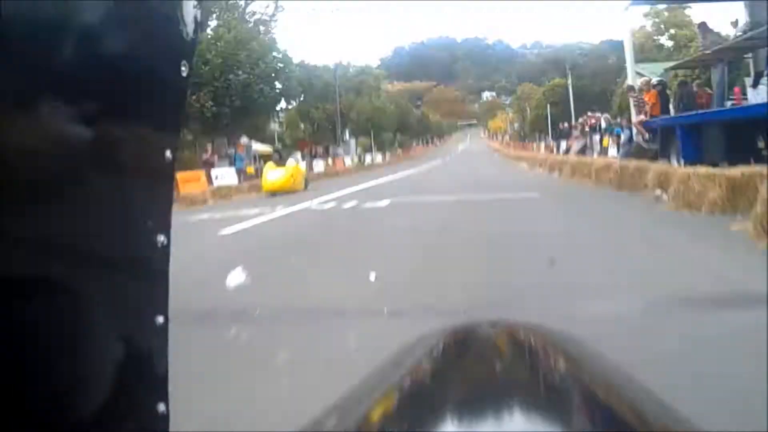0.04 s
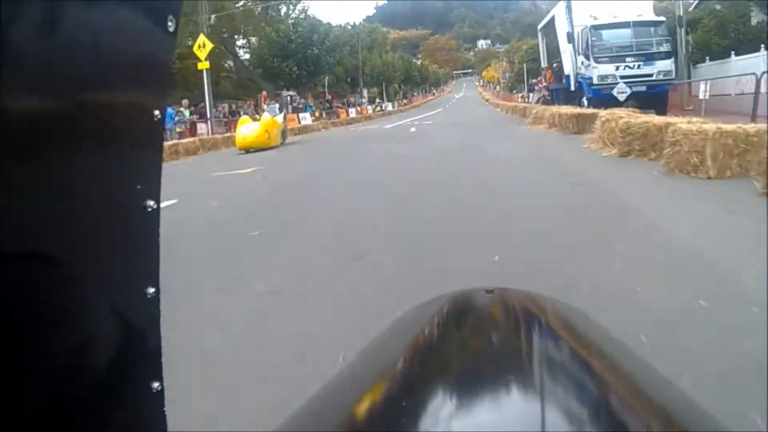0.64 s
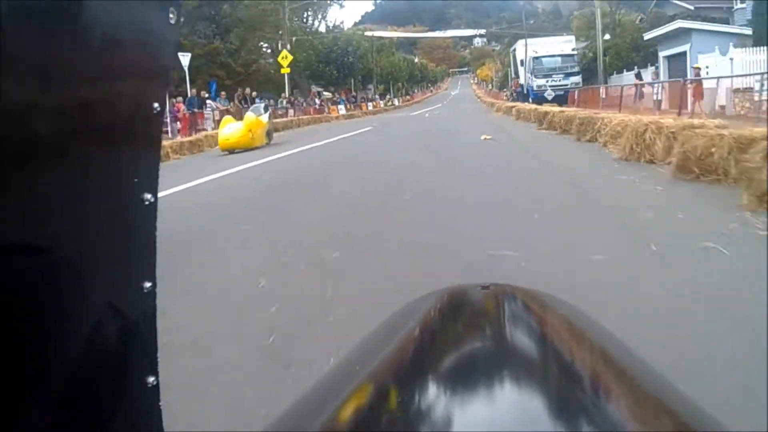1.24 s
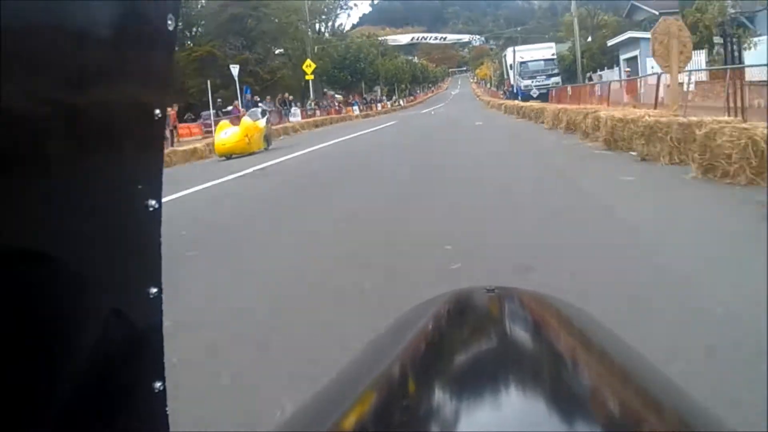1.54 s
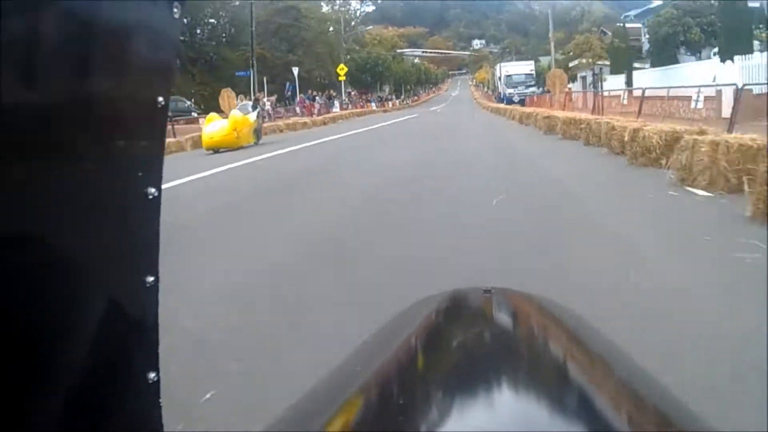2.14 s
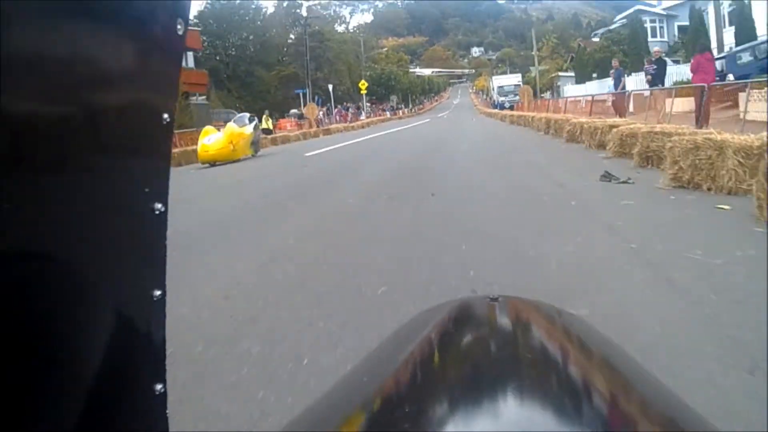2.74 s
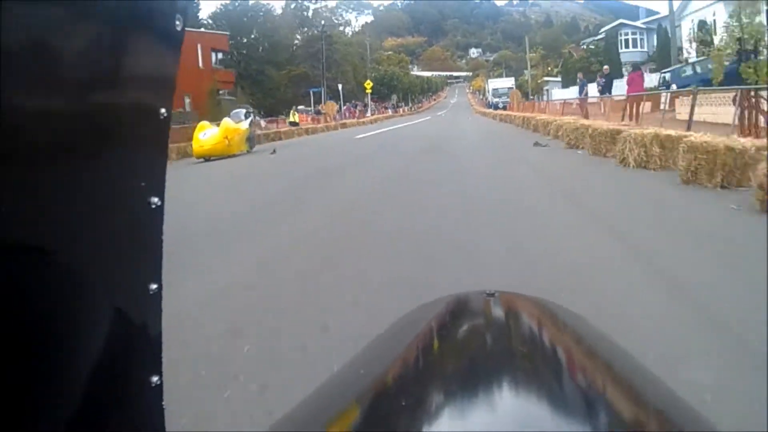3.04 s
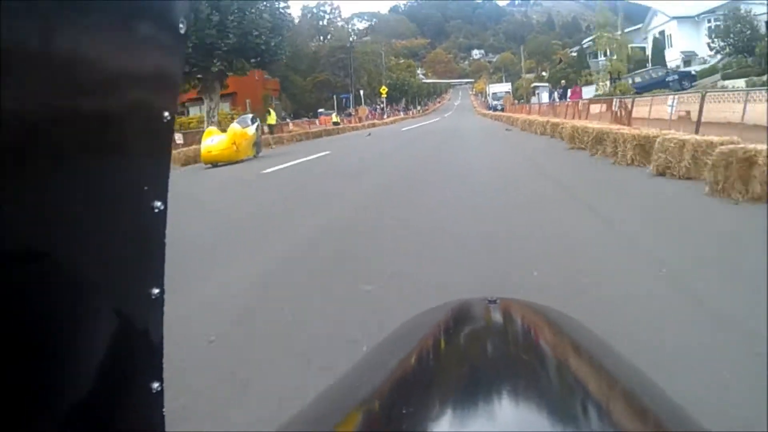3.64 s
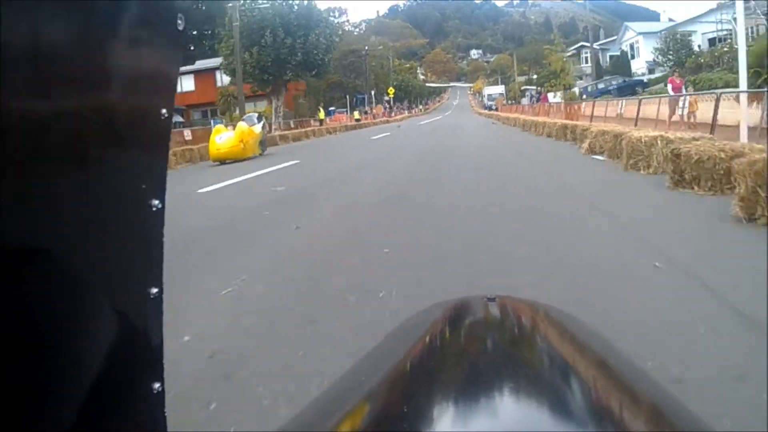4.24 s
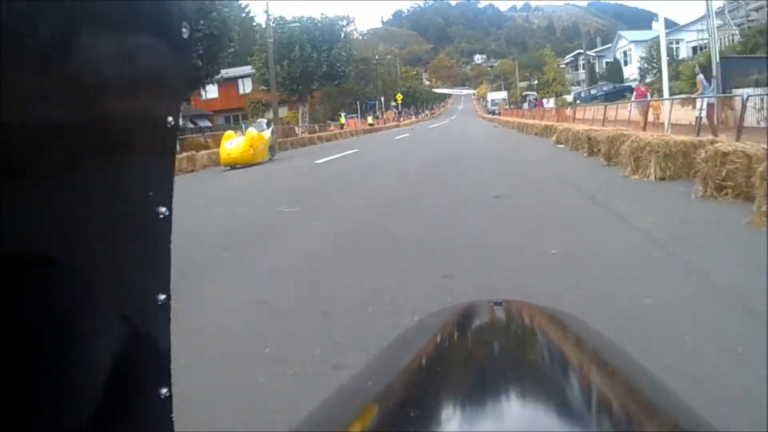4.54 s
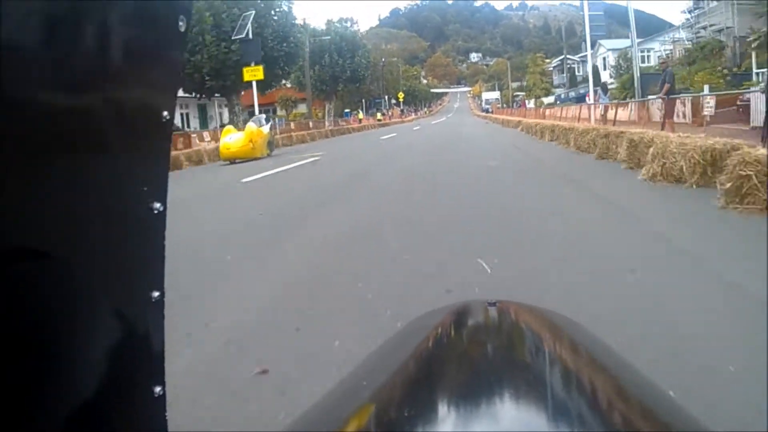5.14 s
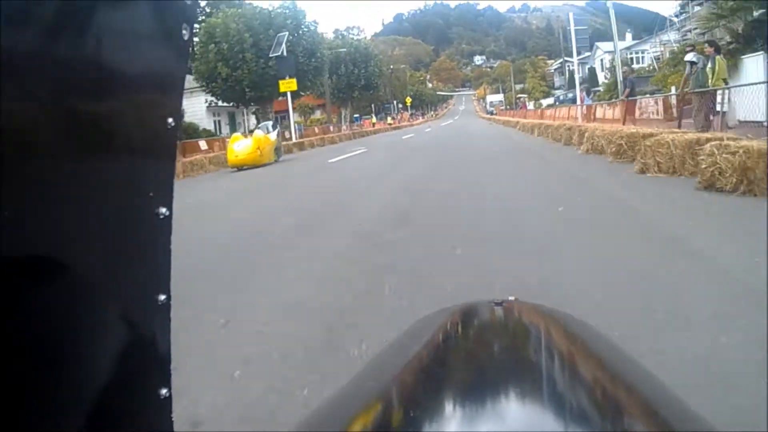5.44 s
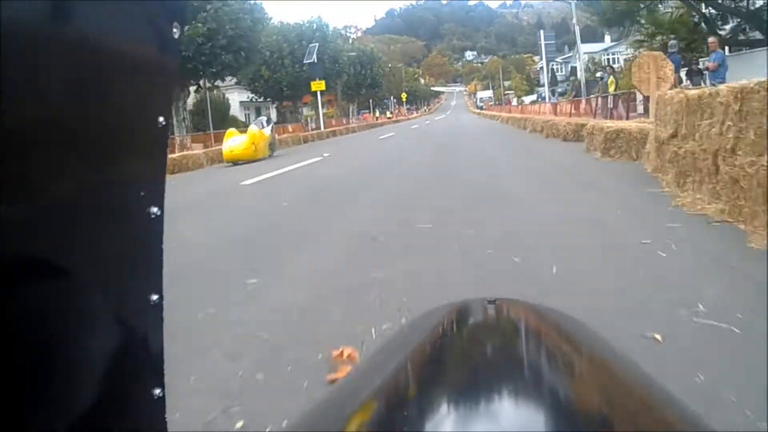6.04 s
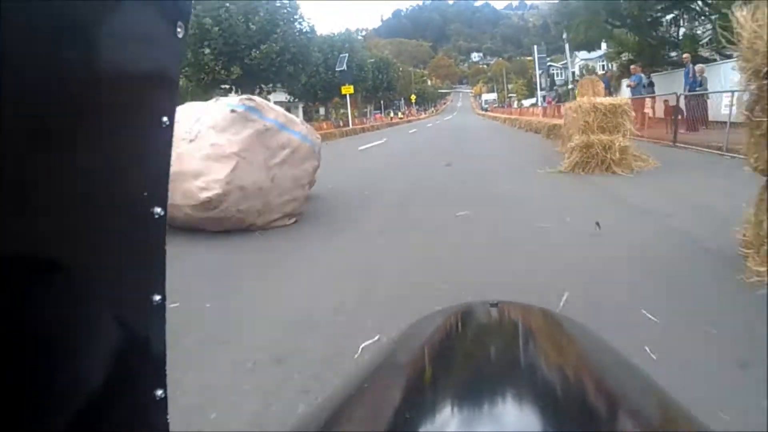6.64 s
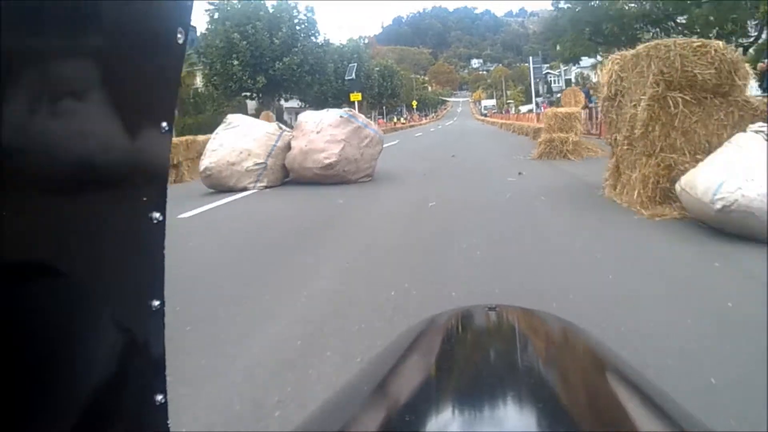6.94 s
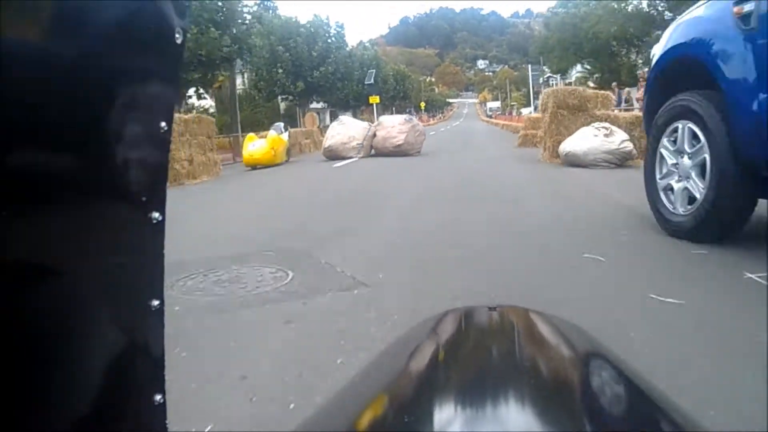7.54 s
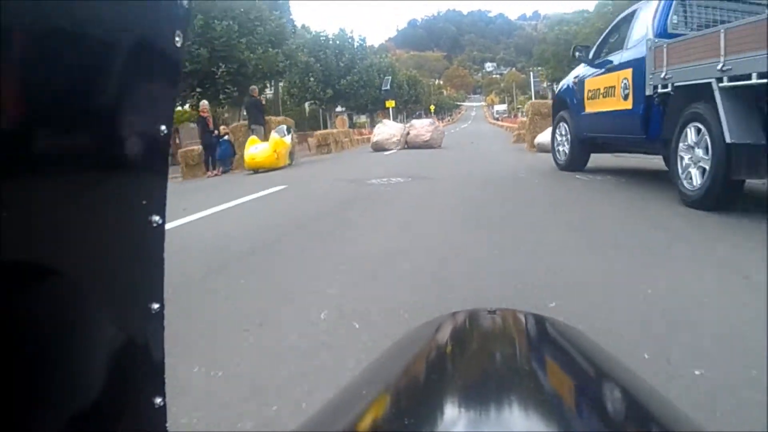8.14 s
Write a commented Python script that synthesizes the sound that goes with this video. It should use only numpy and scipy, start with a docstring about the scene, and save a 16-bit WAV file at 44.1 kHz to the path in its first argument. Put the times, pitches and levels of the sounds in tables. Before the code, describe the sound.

A coasting cart rattles and bangs along a street, its gritty rolling roar and whine gradually sinking as it loses speed.

```python
"""On a street, riding a hollow-bodied gravity cart as it coasts and slows down.
Asphalt grit drums the wheels and sets the shell roaring; the bodywork knocks and rattles, hardest
on the fast first stretch. The running gear whines, falling with the speed, wind rumbles underneath,
and a limiter flattens the hardest blows."""
import sys
import numpy as np
from scipy import signal
from scipy.fft import rfft, irfft
from scipy.io import wavfile
from scipy.ndimage import uniform_filter1d, minimum_filter1d

SR = 44100
rng = np.random.default_rng(int(sys.argv[2]) if len(sys.argv) > 2 else 0)


def materialize(psi):
    """Save the field psi as 16-bit PCM at rate SR to the path in sys.argv[1].

    A 1-D psi becomes a single channel; in a 2-D psi each row is a channel.
    """
    bounded = np.clip(np.atleast_2d(psi).T, -1, 1)
    quanta = np.round(bounded * 32767).astype(np.int16)
    wavfile.write(sys.argv[1], SR, quanta)


N = 370881
TIME = np.arange(N) / SR
START_HZ, CYCLES_PER_TURN = 1806, 97.5   # the gear's opening pitch; its cycles in one wheel turn

# the road, rough at first and then smoother: t/s, shell roar/dB, fine grit/dB
ROAD_LEVELS = [(0.0, -15, -12), (0.09, -15, -22.5), (0.26, -16, -25), (0.51, -18.5, -23.5),
               (0.98, -22.5, -26), (1.61, -17.5, -25), (2.44, -20.5, -25.5), (2.74, -20.5, -25),
               (3.3, -20.5, -28.5), (3.89, -21.5, -28), (4.22, -23.5, -28.5), (4.45, -21.5, -27.5),
               (4.66, -24.5, -30.5), (5.06, -24, -29), (5.34, -25, -28.5), (7.12, -26, -29),
               (7.38, -25.5, -27), (8.41, -29.5, -29.5)]
# ring of the shell: f/Hz, width/Hz, level/dB
SHELL_RESONANCES = [(1156.5, 59, 2), (1257.5, 76, 7), (1423, 138, 4), (1702, 220, 0.5), (2251, 143, 1),
                    (2545, 220, -6.5), (3033, 210, -13.5), (3348, 80, -17), (3604, 83, -19),
                    (4084, 170, -25.5), (5020, 750, -28.5)]
# low ring of frame and cavity: f/Hz, width/Hz, level/dB
FRAME_RESONANCES = [(173, 47, -3.5), (245.7, 24, 0), (320, 20, -10), (462.4, 41, -1.5), (586.4, 93, 0.5),
                    (766, 35, -7), (863, 37, -0.5), (1000, 230, -25.5)]


def from_db(db):
    """Decibels to gain."""
    return 10 ** (np.asarray(db) / 20)


def unit_rms(x):
    """Scale to unit rms."""
    return x / np.sqrt(np.mean(x ** 2) + 1e-20)


def curves(rows):
    """Each column of a breakpoint table at every sample."""
    times, *columns = np.transpose(rows)
    return [np.interp(TIME, times, column) for column in columns]


def drift(rate, hop=40):
    """Smooth, bounded random modulation with spread about 1, moving about rate times a second."""
    pole = np.exp(-2 * np.pi * hop * rate / SR)
    noise = rng.standard_normal(N // hop + 2002)
    slow = signal.lfilter([1], [1, -2 * pole, pole * pole], noise)[2000:]
    bounded = 2.3 * np.tanh(unit_rms(slow) / 2)
    return np.interp(np.arange(N) / hop, np.arange(len(bounded)), bounded)


def response(gain, size=4096):
    """Minimum-phase impulse response with unit energy for a gain given as a function of Hz."""
    hz = np.maximum(np.arange(size // 2 + 1) * SR / size, 1)
    cepstrum = irfft(np.log(gain(hz) + 1e-7))
    cepstrum[1:size // 2] *= 2
    cepstrum[size // 2 + 1:] = 0
    impulse = irfft(np.exp(rfft(cepstrum)))[:size // 2]
    return impulse / np.sqrt(np.sum(impulse ** 2))


def resonances(modes, hz, damping_hz=4300):
    """Gain of a set of broad resonances; damping swallows the top."""
    power = sum(from_db(db) ** 2 / (1 + ((hz - centre) / width) ** 2) ** 2 for centre, width, db in modes)
    return np.sqrt(power / (1 + (hz / damping_hz) ** 24))


def treble_share(hz, crossover_hz=2259):
    """Rises from 0 to 1 into the range where the shell answers to fine grit and hard contacts."""
    return 1 / (1 + (crossover_hz / hz) ** 10)


def excite(force, gain):
    """Play a force through a body with the given gain curve."""
    return signal.oaconvolve(force, response(gain))[:N]


def add(out, at_s, sound):
    """Mix a sound in at a given time."""
    start = max(round(at_s * SR), 0)
    out[start:start + len(sound)] += sound[:N - start]


def gear_hz(sag_hz_per_s=126.1, sag_growth_hz_per_s2=4.67):
    """Pitch of the running gear: it sags with the cart's speed, a little faster as time goes on."""
    return START_HZ - sag_hz_per_s * TIME - sag_growth_hz_per_s2 * TIME ** 2 / 2


def wheel_turns():
    """Turns that the wheels have made so far."""
    return np.cumsum(gear_hz()) / SR / CYCLES_PER_TURN


def grit(per_s, spread_db, flutter_db):
    """Stones meeting the tyres: random small impacts whose strength flutters with wheel load."""
    sizes = from_db(spread_db * np.minimum(rng.exponential(1, N), 4.5)) * rng.choice([-1, 1], N)
    hits = rng.random(N) < per_s / SR
    return unit_rms(sizes * hits * from_db(flutter_db * drift(31)))


def rolling(bounce_db=1.6, wobble_db=0.5):
    """Coarse stones drum the shell and frame; fine grit drives the upper ring and an airy tyre hiss."""
    # bands of the tyre hiss: f/Hz, width/Hz, level/dB
    hiss_bands = [(7040, 270, 4), (10300, 1600, -8.5)]
    roar_db, grit_db = curves(ROAD_LEVELS)
    rumble_db = -39.5 + 0.25 * (roar_db - roar_db.mean())
    speed = gear_hz() / START_HZ
    hiss_gain = from_db(-62) * speed ** 7.5 + from_db(grit_db - 49.5)   # dies to a trace as the cart slows
    wheel_load = from_db(bounce_db * drift(24) + wobble_db * np.sin(2 * np.pi * wheel_turns()))
    stones = grit(per_s=3500, spread_db=2.5, flutter_db=1.5)
    sand = grit(per_s=4500, spread_db=2.5, flutter_db=1.57)
    bumps = grit(per_s=3000, spread_db=1.5, flutter_db=1.0)
    roar = excite(stones, lambda hz: resonances(SHELL_RESONANCES, hz) * np.sqrt(1 - treble_share(hz)))
    sizzle = excite(sand, lambda hz: resonances(SHELL_RESONANCES, hz) * np.sqrt(treble_share(hz)))
    rumble = excite(bumps, lambda hz: resonances(FRAME_RESONANCES, hz))
    hiss = excite(sand, lambda hz: resonances(hiss_bands, hz, damping_hz=15000))
    shell = from_db(roar_db - 0.5) * roar + from_db(grit_db + 0.5) * sizzle
    return wheel_load * (shell + from_db(rumble_db) * rumble + hiss_gain * hiss)


def wind(gust_db=1.5):
    """The air stream flutters on the microphone and makes the hollow body boom."""
    # buffeting by the air stream: t/s, deep flutter/dB, boom/dB
    buffeting = [(0.0, -49, -47), (1.19, -55, -48.5), (2.86, -53.5, -51), (3.42, -61.5, -61),
                 (3.93, -59, -56), (4.26, -64, -61), (8.06, -57, -62.5), (8.41, -66, -65)]
    flutter_db, boom_db = curves(buffeting)
    flutter = excite(rng.standard_normal(N), lambda hz: resonances([(30, 23, 0)], hz))
    boom = excite(rng.standard_normal(N), lambda hz: resonances([(67, 32, -1), (92, 24, -6.5)], hz))
    return flutter * from_db(flutter_db + 4.5 + gust_db * drift(8)) + boom * from_db(boom_db + 1.5)


def shaken_tone(phase, roughness, flutter_db):
    """A partial whose strength flutters, with a narrow skirt of noise from road vibration."""
    skirt = drift(55) * np.sin(phase) + drift(42) * np.cos(phase)
    flutter = from_db(flutter_db * drift(28))
    return unit_rms((np.sin(phase) + roughness * skirt) * flutter)


def gear_whine(level_db=2.0, throb_db=2.6):
    """A falling whine that throbs with each turn; harmonics swell as they cross the axle's resonances."""
    # partials of the whine: multiple, level/dB, roughness/0-1, flutter/dB
    harmonics = [(1, .3, .35, 2), (2, -6.5, .55, 2.6), (5, -6, .5, 1.5)]
    # ring of the axle mount: f/Hz, width/Hz, level/dB
    axle_modes = [(615, 20, -37), (663.4, 14, -36.5), (784, 18, -44), (884, 28, -47), (1243.6, 42, -22.5),
                  (1331, 18, -22.5), (1397, 31, -28), (1535, 22, -27), (1605, 25, -24), (1758, 26, -21),
                  (1837, 28, -25), (2190, 20, -16), (2258, 30, -14), (2380, 81, -21), (2540, 73, -32),
                  (3300, 65, -37)]
    pitch, wheel_angle = gear_hz(), 2 * np.pi * wheel_turns()
    throb = unit_rms(from_db(throb_db * np.sin(wheel_angle + 1.4 * drift(8.9))))
    whine = np.zeros(N)
    for multiple, db, roughness, flutter_db in harmonics:
        tone = shaken_tone(multiple * CYCLES_PER_TURN * wheel_angle, roughness, flutter_db)
        whine += from_db(level_db + db) * resonances(axle_modes, multiple * pitch) * tone
    return throb * whine


def low_thuds(cutoff_hz=340, size=8000):
    """Dull low thuds under the hard knocks and rattles."""
    # bursts of low noise: t/s, length/s, level/dB
    thuds = [(0, 0.13, -28), (1.765, 0.015, -28.5), (2.218, 0.0084, -28), (2.901, 0.066, -25.5),
             (5.48, 0.033, -49)]
    out, t = np.zeros(N), TIME[:size]
    low_band = response(lambda hz: hz / (hz + 30) / (1 + (hz / cutoff_hz) ** 3))
    for at_s, length, db in thuds:
        burst = rng.standard_normal(size) * np.exp(-(t / length) ** 4)
        add(out, at_s, from_db(db) * signal.fftconvolve(burst, low_band))
    return out


def struck_body(bright_db, panel_db, panel_hz=2550, panel_octaves=0.89, uneven_db=2.0):
    """Ring of shell and frame: each spot favours other resonances, a hard contact the upper ones."""
    modes = [(hz, 0.83 * width, db + uneven_db * rng.standard_normal())
             for hz, width, db in SHELL_RESONANCES]

    def gain(hz):
        """A loose panel adds its own broad ring to the shell's, over the frame and a low thump."""
        panel = np.exp(-(np.log2(hz / panel_hz) / panel_octaves) ** 2)
        shell = resonances(modes, hz) * from_db(bright_db * treble_share(hz) + panel_db * panel)
        frame = from_db(-16) * resonances(FRAME_RESONANCES, hz)
        thump = from_db(-17) / (1 + (hz / 220) ** 2)
        return shell + frame + thump
    return response(gain)


def rattles(tail_s=0.0046, spread_db=2.5, size=5000):
    """Panels buzz against each other in a dense run of contacts, then settle."""
    # loose panels chattering after a bump: t/s, length/s, level/dB
    chatter = [(.001, 0.042, 8), (.062, 0.025, -5.5), (.181, 0.022, -17), (.207, 0.024, -10.5),
               (.599, 0.029, -6.5), (.642, 0.036, -6.5), (1.43, .025, -19), (1.667, 0.018, -8.5),
               (1.787, 0.015, -18.5), (1.852, 0.016, -15), (2.368, 0.0084, -9.5), (2.629, 0.011, -9.5),
               (2.938, 0.01, -4), (3.631, 0.048, -23), (4.83, 0.035, -25), (5.16, .06, -25.5),
               (5.502, 0.016, -16.5), (5.69, 0.076, -23.5), (7.56, 0.094, -26)]
    out, t = np.zeros(N), TIME[:size]
    rows = chatter + wheel_buzzes()
    bodies = [struck_body(bright_db=9.5, panel_db=5.0) for _ in rows]
    for (at_s, length, db), body in zip(rows, bodies):
        contacts = rng.standard_normal(size) * from_db(spread_db * rng.standard_normal(size))
        envelope = np.exp(-np.maximum(t - length, 0) / tail_s - 0.14 * t / length)
        buzz = signal.fftconvolve(contacts * envelope, body)
        burst = buzz[TIME[:len(buzz)] < length + 0.001]
        add(out, at_s, from_db(db) * buzz / np.std(burst))
    return out


def knocks(contact_s=0.0038, tail_s=0.025, tail_db=-22, size=2600):
    """A brief crunching contact, then a weak shiver of the panels; the level is set on the attack."""
    # hard single knocks of the bodywork: t/s, level/dB, brightness/dB
    hard_knocks = [(.107, -1, -10), (.116, -2.5, -2), (.248, -7, 12.5), (.254, -5, -18), (.330, -12, 12),
                   (.422, -5, -28), (.552, 0, 6.5), (.722, -7, -3), (.731, -7.5, -20), (.746, -7.5, -5),
                   (.894, -16, -11), (1.311, -11.5, -7), (1.519, -12, -1), (1.571, -12, -4),
                   (1.602, -9.5, 1), (1.652, -12.5, 4.5), (1.764, -4, 2.5), (1.826, -5, 7),
                   (2.088, -11.5, -7), (2.220, 5, -5.5), (2.553, -10, -7), (2.891, -10, 3), (2.905, 4, -2),
                   (2.932, 6, -6.5), (2.973, 0.5, -11), (3.168, -12, -5), (3.238, -13, 4), (3.516, -17, -3),
                   (4.668, -20, -1.5), (5.477, -16.5, -16), (5.503, -9, -3), (5.950, -17, 6),
                   (6.166, -15, 4), (7.137, -20, -3)]
    out, t = np.zeros(N), TIME[:size]
    rows = hard_knocks + light_knocks()
    envelope = np.exp(-(t / contact_s) ** 4) + from_db(tail_db) * np.exp(-t / tail_s)
    forces = rng.standard_normal((len(rows), size)) * envelope
    for (at_s, db, bright_db), force in zip(rows, forces):
        blow = signal.fftconvolve(force, struck_body(bright_db + 6, panel_db=2.5))
        attack = blow[TIME[:len(blow)] < 0.0045]
        add(out, at_s, from_db(db) * blow / np.std(attack))
    return out


def light_knocks(count=24, spread_db=2.5, bright_db=-2):
    """Small bumps at random, stronger on rough road: rows of t/s, level/dB, brightness/dB."""
    when, strength = rng.random((count, 2)).T
    times = when * N / SR
    roar_db, _ = curves(ROAD_LEVELS)
    levels = np.interp(times, TIME, roar_db) + spread_db * (2 * strength - 1)
    return [(at_s, db, bright_db) for at_s, db in zip(times, levels)]


def wheel_buzzes(start_s=2.505, length_s=0.02):
    """For a while one buzz per wheel turn, spreading as the cart slows: rows of t/s, length/s, level/dB."""
    # panel buzz, turn by turn: level/dB
    levels = [-6, 1.5, -10, -13.5, -12.5, -11.5, -7, -18.5, -16.5, -23, -14.5, -16]
    turns = wheel_turns()
    first_turn = np.interp(start_s, TIME, turns)
    return [(np.interp(first_turn + k, turns, TIME), length_s, db) for k, db in enumerate(levels)]


def scene():
    """The bed of the ride and the hits on top of it, heard in mono from the cart."""
    ride = rolling() + wind() + gear_whine()
    hits = knocks() + rattles() + low_thuds()
    return (ride + hits)[None]


def limiter(x, ceiling=1.277, release_db_per_s=1500, size=61):
    """The gain ducks just ahead of a peak and recovers quickly."""
    over_db = 20 * np.log10(np.maximum(np.abs(x) / ceiling, 1))
    release_db = release_db_per_s * TIME
    held_db = np.maximum.accumulate(over_db + release_db, axis=-1) - release_db
    lookahead_db = -minimum_filter1d(-held_db, size // 2)
    duck_db = uniform_filter1d(uniform_filter1d(lookahead_db, size), size)
    return x * from_db(-duck_db)


def overload(x, hardness=11):
    """Peaks that slip past the limiter are flattened and crunch."""
    return x / (1 + np.abs(x) ** hardness) ** (1 / hardness)


def record(dry, top_cut_hz=15850):
    """Limiter and overload, faint hiss and a thin high whistle, dips in the treble and a steep top cut."""
    whistle = sum(shaken_tone(2 * np.pi * hz * TIME, roughness=0.4, flutter_db=1.5)
                  for hz in (14574, 14665))
    hiss = rng.standard_normal(dry.shape)
    wet = overload(limiter(dry)) + from_db(-78) * hiss + from_db(-90) * whistle
    for notch_hz, q in [(6000, 3.4), (8000, 0.85)]:
        wet = signal.lfilter(*signal.iirnotch(notch_hz, q, fs=SR), wet)
    return signal.sosfilt(signal.ellip(10, 0.1, 80, top_cut_hz, fs=SR, output="sos"), wet)


dry = scene()
out = record(dry)
materialize(out)
```